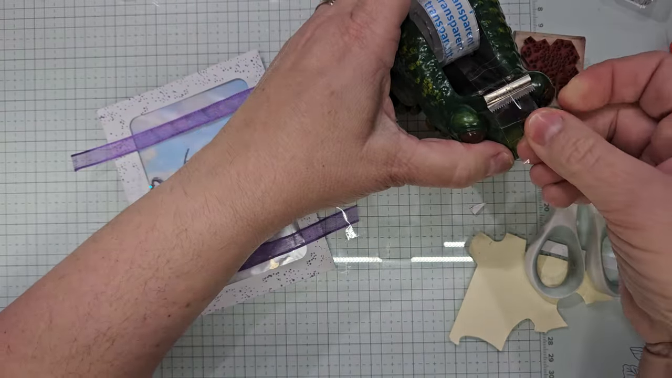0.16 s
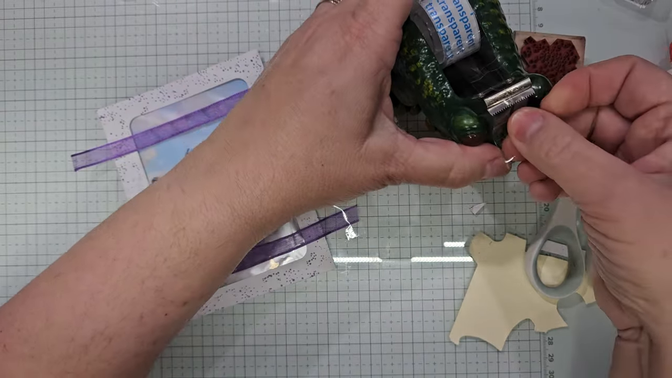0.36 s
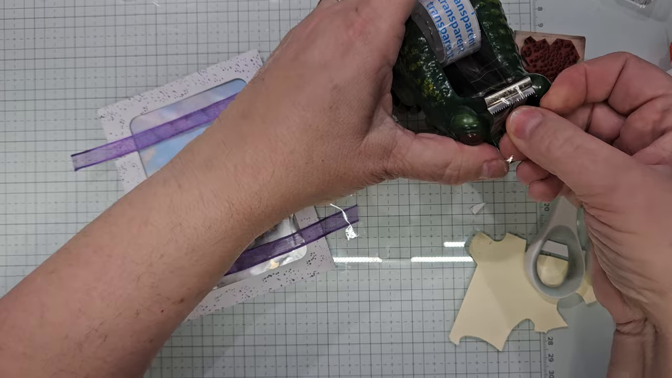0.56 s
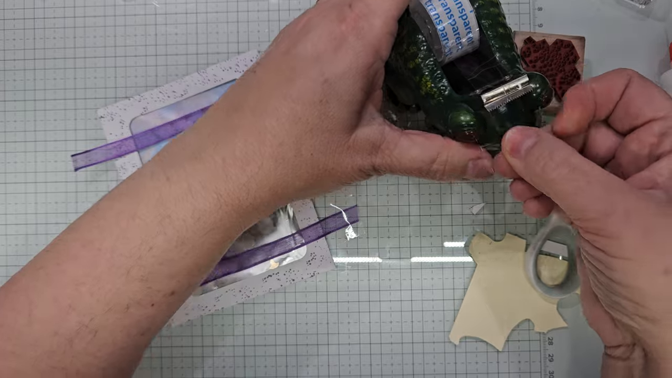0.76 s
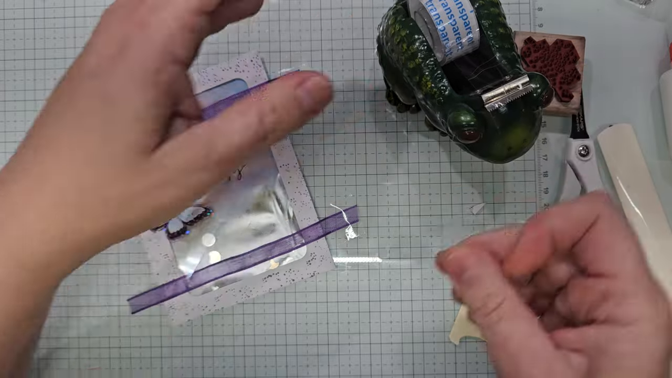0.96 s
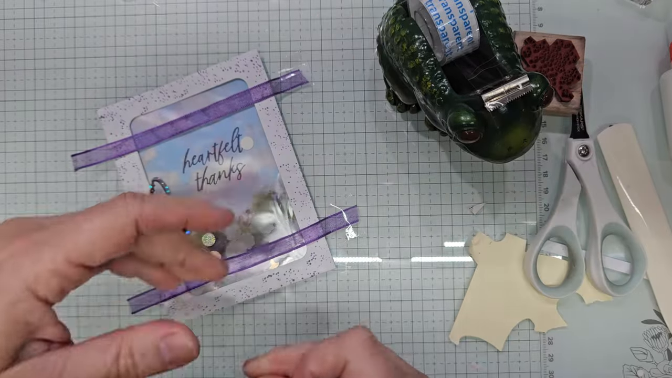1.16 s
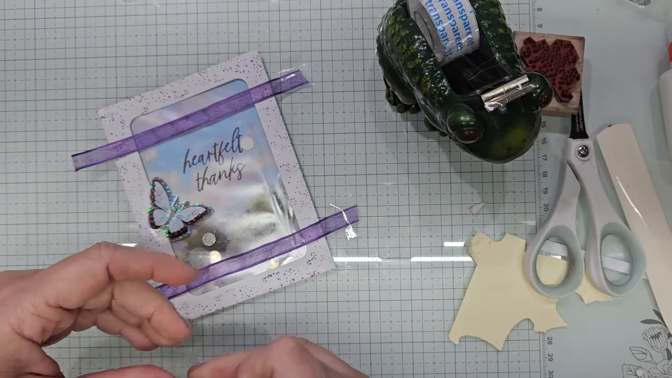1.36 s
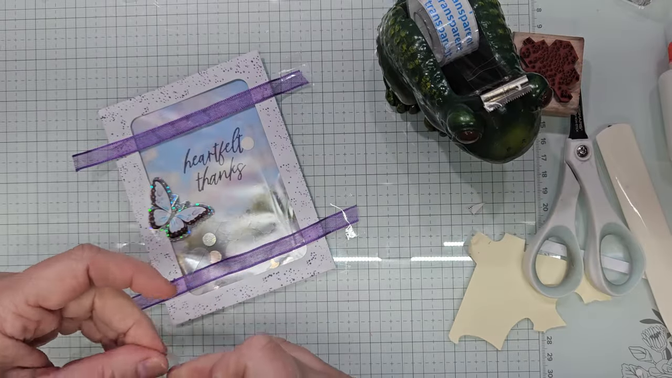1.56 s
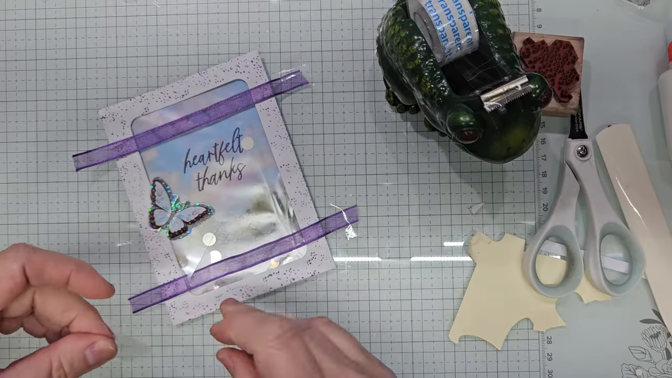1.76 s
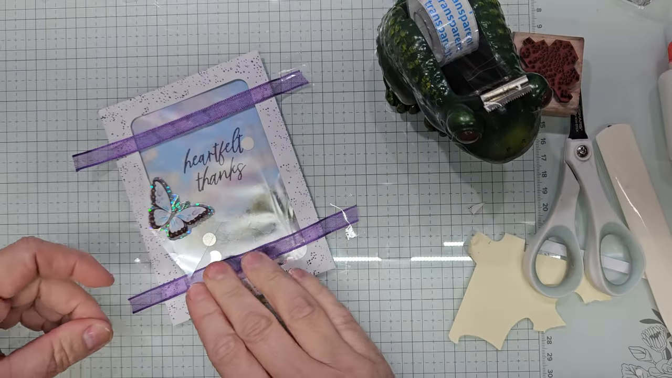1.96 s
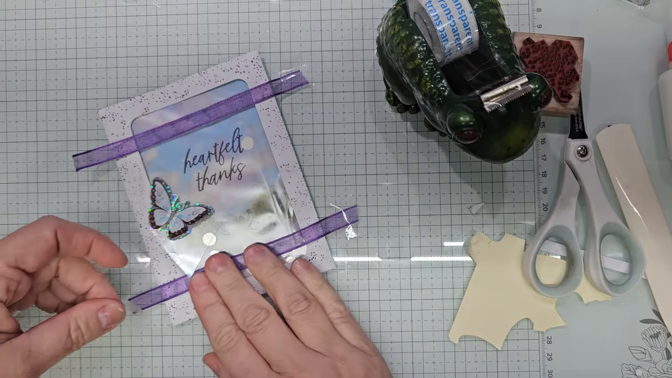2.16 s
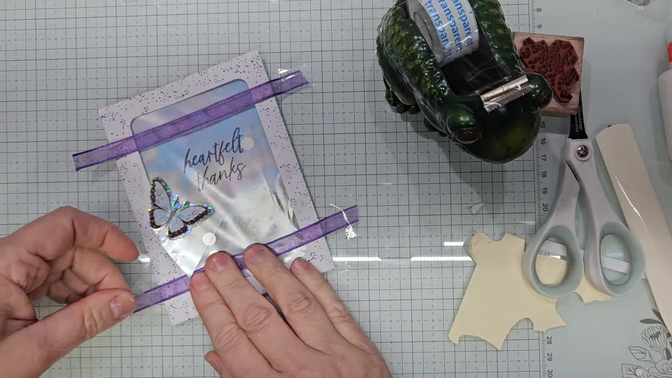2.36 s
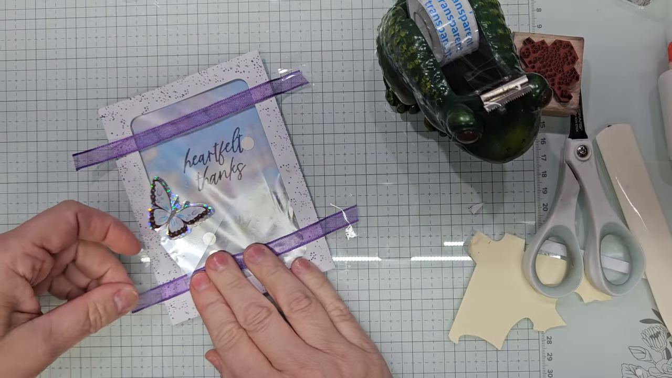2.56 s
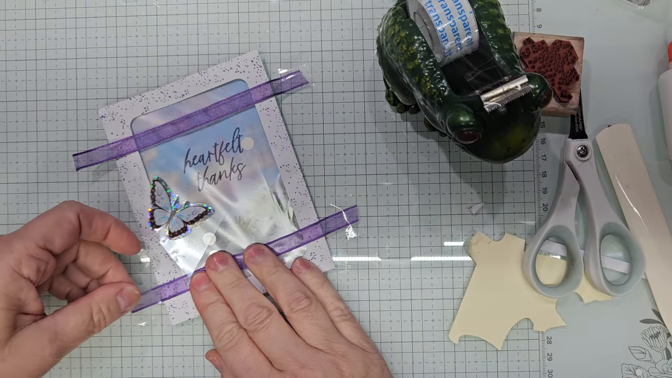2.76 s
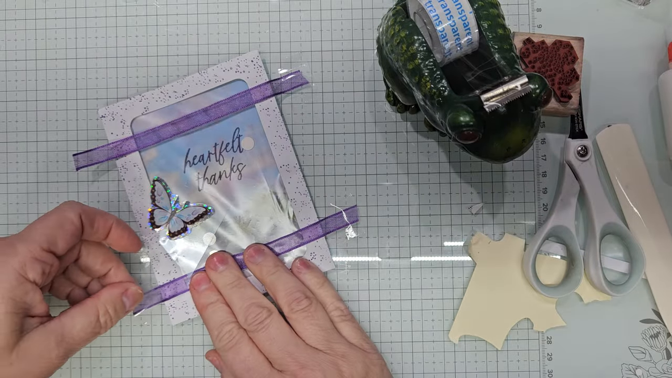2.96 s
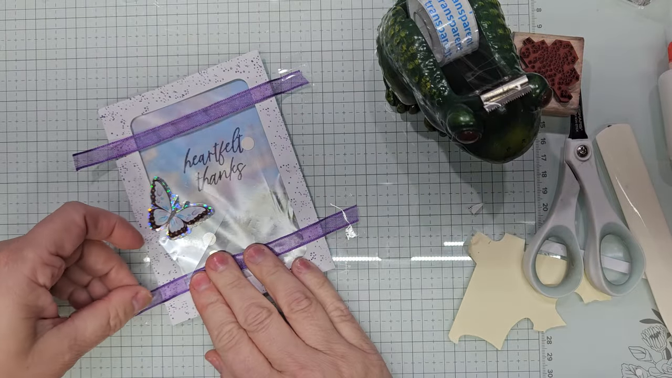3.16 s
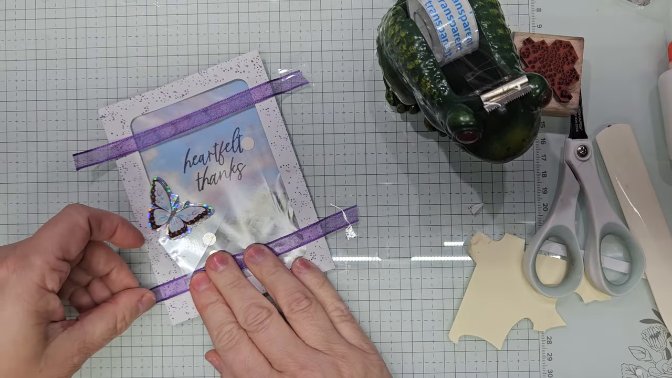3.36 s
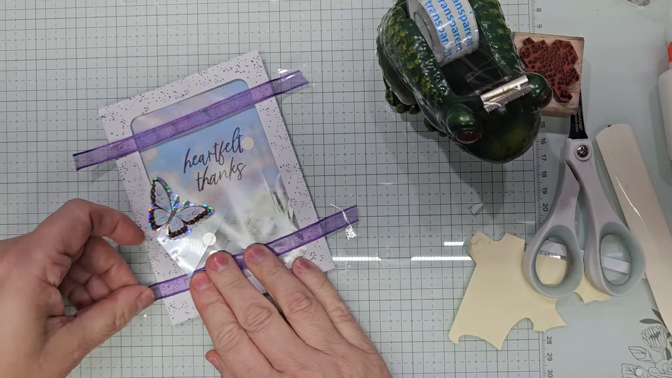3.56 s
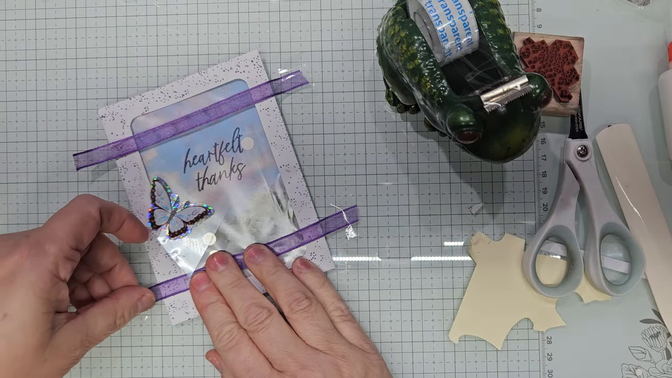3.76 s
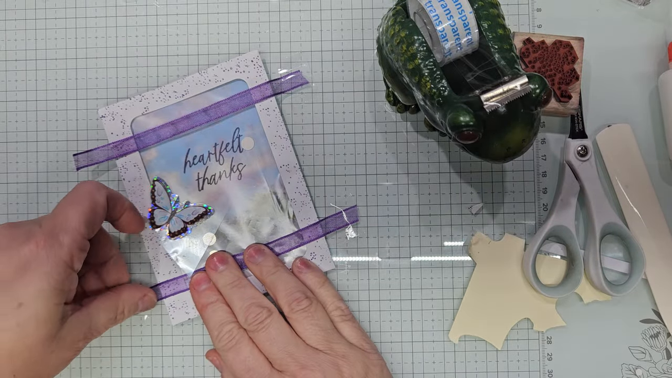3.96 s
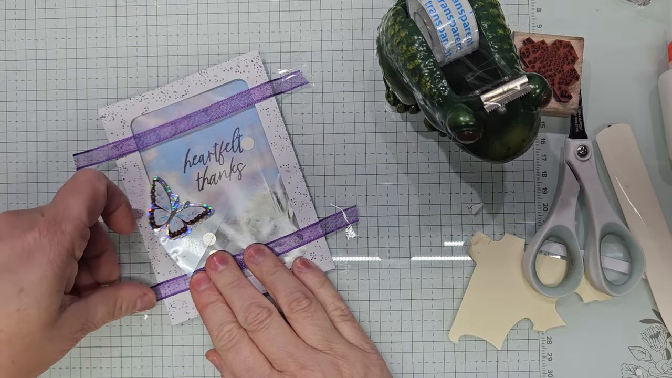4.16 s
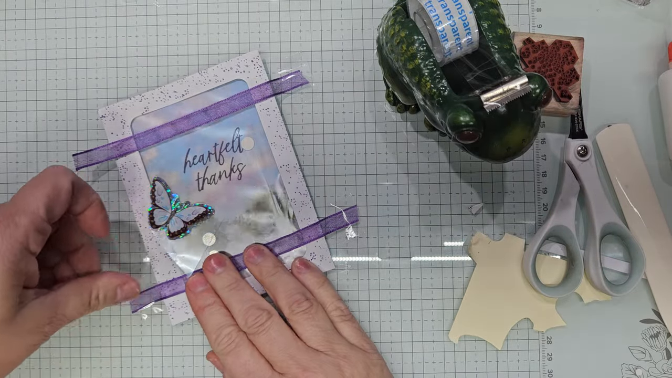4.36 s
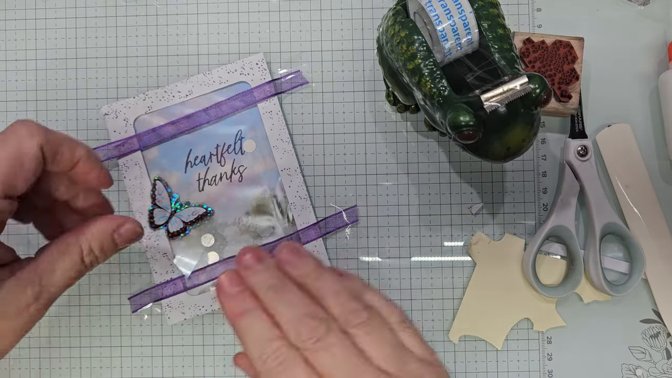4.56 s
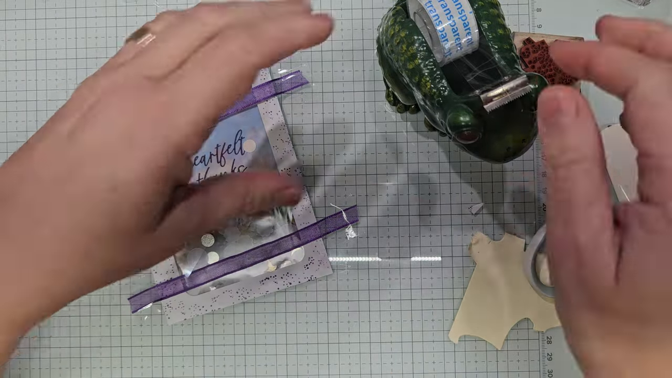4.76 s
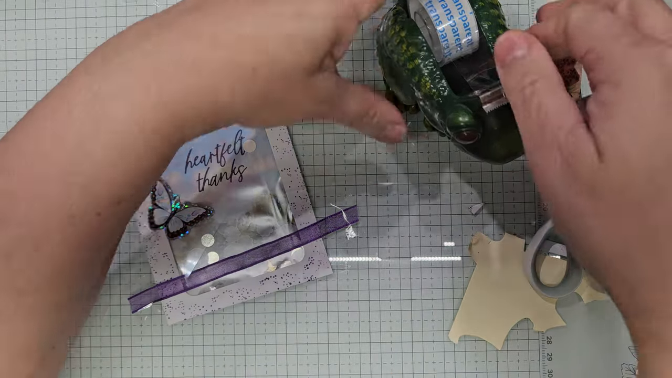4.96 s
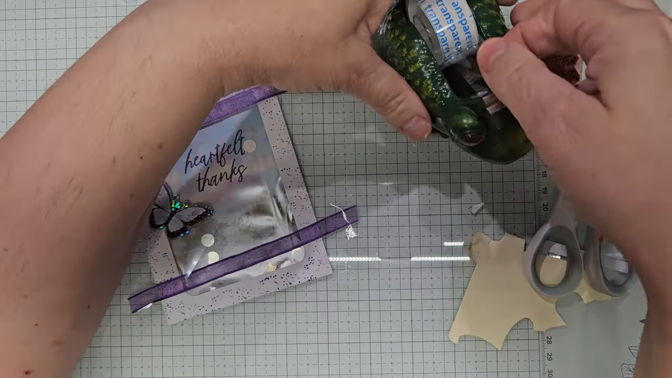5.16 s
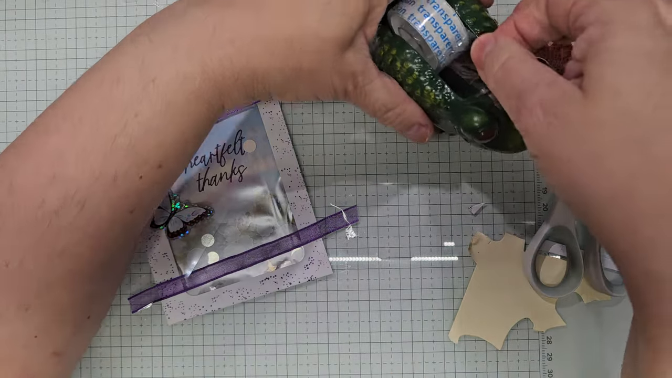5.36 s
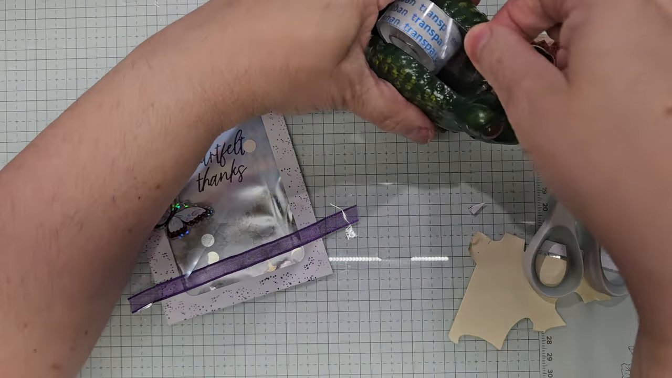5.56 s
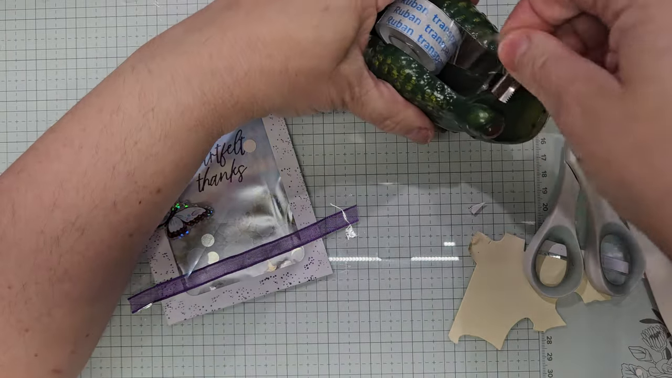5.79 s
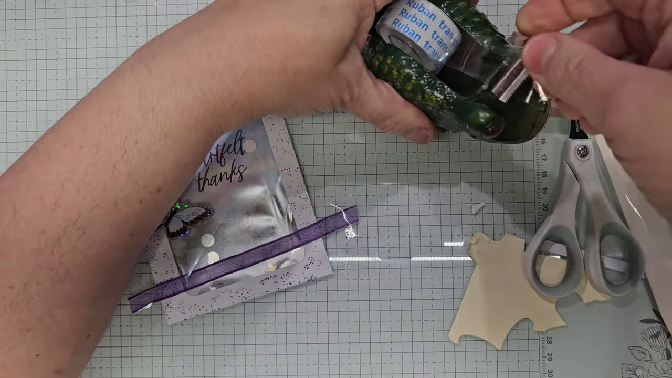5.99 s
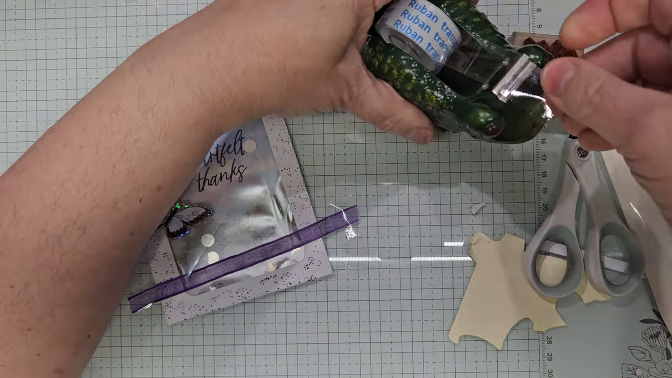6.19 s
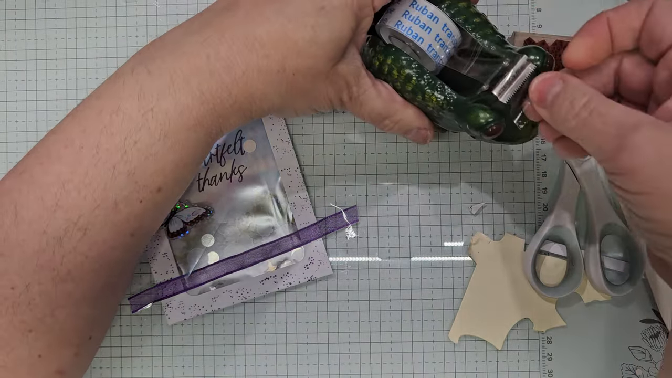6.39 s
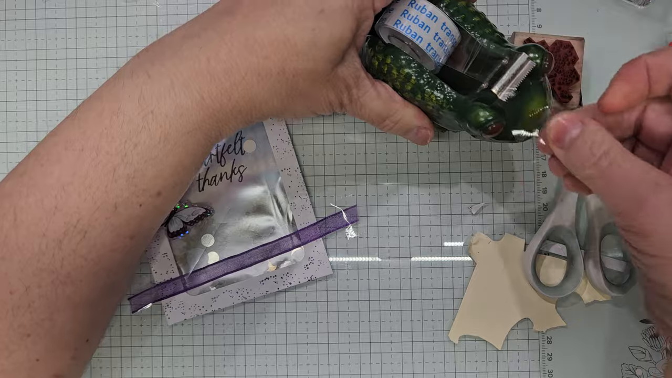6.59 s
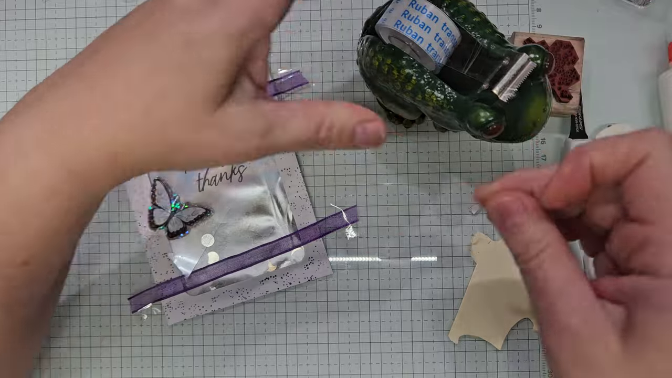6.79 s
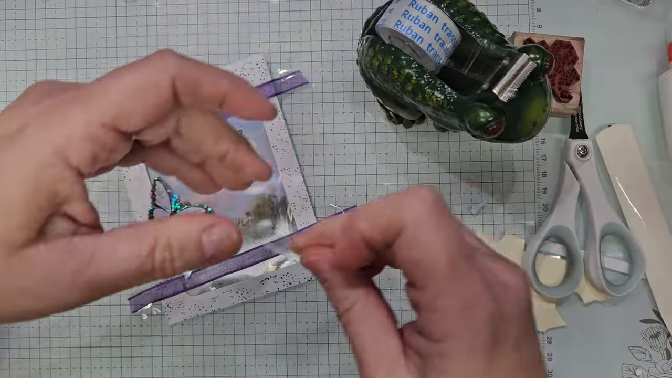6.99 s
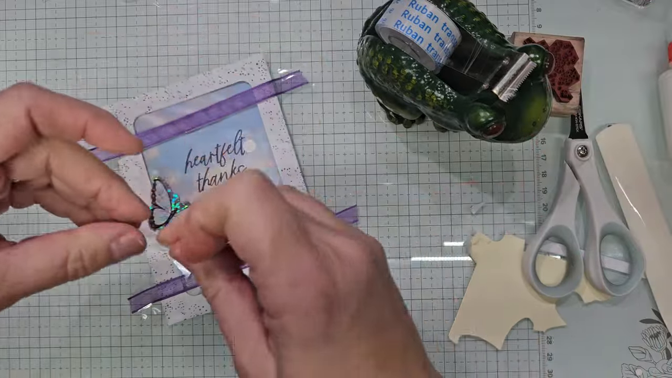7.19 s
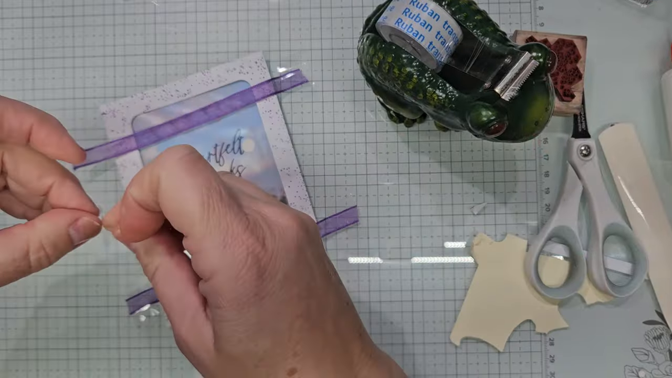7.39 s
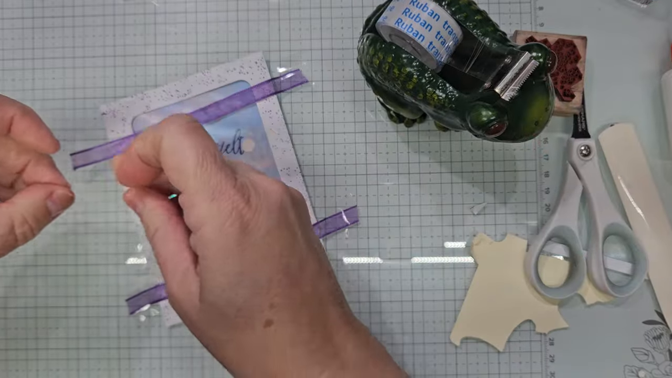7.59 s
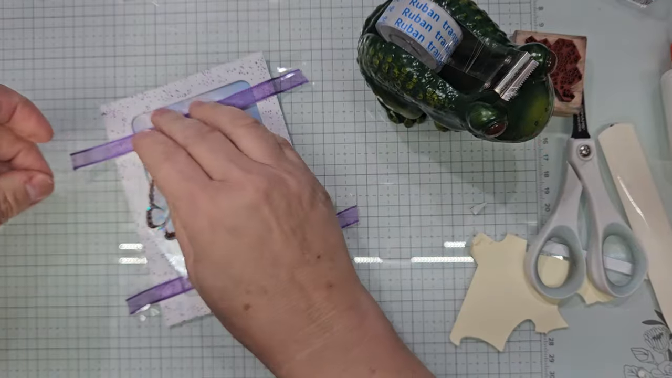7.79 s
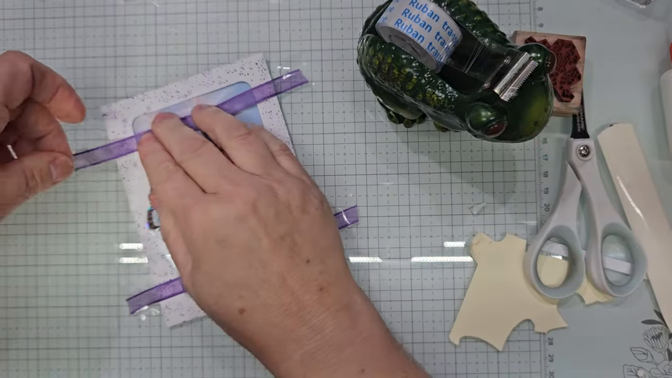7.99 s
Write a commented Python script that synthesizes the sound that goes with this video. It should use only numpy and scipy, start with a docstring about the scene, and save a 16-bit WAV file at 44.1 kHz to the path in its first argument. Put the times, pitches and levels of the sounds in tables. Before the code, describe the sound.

Close above a craft table in a small quiet room, fingers tick and crackle on tape, which tears sharply on a dispenser's teeth. Small crisp ticks follow as it is pressed onto a card, with long near-silent gaps. Then tape is pulled from the roll in loud, stuttering jerks with dull table thuds, torn with a bright snap, and handled softly again over a low hum.

```python
"""First a crackle and a cluster of finger ticks close by, then adhesive tape tears on the cutter of a ceramic
desk dispenser. It is stuck to a card, peeled off the roll in stick-slip jerks and torn again.
Snaps and crackle excite resonances of film, roll and hands; decaying modes make the taps, rings and table thuds.
The place is a small quiet room with a low hum, heard by a two-microphone phone above the table."""
import sys
import numpy as np
from scipy import signal
from scipy.fft import rfft, irfft, next_fast_len
from scipy.io import wavfile
from scipy.ndimage import uniform_filter1d, map_coordinates

SR = 44100
rng = np.random.default_rng(int(sys.argv[2]) if len(sys.argv) > 2 else 0)


def store_wav(level_fs):
    """Save 16-bit WAV to argv[1]."""
    pcm = np.round(np.clip(np.atleast_2d(level_fs), -1, 1) * 32767)
    wavfile.write(sys.argv[1], SR, pcm.T.astype(np.int16))


N = 354123  # length [samples]


def amp(db):
    """Decibels to gain."""
    return 10 ** (np.asarray(db) / 20)


def unit(x):
    """Scaled to rms 1."""
    return x / np.sqrt(np.mean(x ** 2) + 1e-20)


def along(points, hz):
    """Interpolates (frequency [Hz], value) points on a log frequency axis."""
    f, v = np.transpose(points)
    return np.interp(np.log(hz + 1), np.log(f + 1), v)


def wobble(rate):
    """A smooth random curve with rate knots a second."""
    return map_coordinates(rng.standard_normal(int(N * rate / SR) + 4), [np.arange(N) * rate / SR])


def filtered(x, response):
    """x times a complex response of frequency."""
    m = next_fast_len(N + SR // 2)
    return irfft(rfft(x, m) * response(np.fft.rfftfreq(m, 1 / SR)), m)[..., :N]


def resonant(drives, peaks):
    """One drive for each resonance (or one for all), summed with alternating sign."""
    m = next_fast_len(N + SR // 2)
    f, spectra = np.fft.rfftfreq(m, 1 / SR), rfft(drives, m)
    out = 0
    for k, (center, width, db) in enumerate(peaks):
        band = 1j * f * width / (center * center - f * f + 1j * f * width)
        out = out + (-1) ** k * amp(db) * band * spectra[k % len(spectra)]
    return irfft(out, m)[..., :N]


def shares(peaks, hz, octaves, least):
    """The spot that is excited favours the resonances nearest to hz."""
    return np.array([least + np.exp(-(np.log2(center / hz) / octaves) ** 2) for center, _, _ in peaks])


SWELL_DB = 23.5  # a burst rises by this much and falls by it again
EDGE_S = .004  # fade from and to near silence


def burst(start, rise, hold, fall, db):
    """Gain per sample: a swell, a hold and a fall, nearly silent outside."""
    s = start + np.cumsum([-EDGE_S, EDGE_S, abs(rise), abs(hold), abs(fall), EDGE_S])
    levels = [-120, db - SWELL_DB, db, db, db - SWELL_DB, -120]
    return amp(np.interp(np.arange(N) / SR, s, levels))


# Dispenser, roll and cupped hands at the microphone: (frequency [Hz], width [Hz], relative level [dB])
BODY_PEAKS = [(714, 130, 2.5), (1056, 250, -0.5), (1300, 330, 4.5), (1550, 390, 4), (2300, 280, -1.5)]
# Taut tape: (frequency [Hz], width [Hz], relative level [dB])
FILM_PEAKS = [(3210, 800, -4), (4100, 700, -2), (4870, 890, -2.5), (6740, 1750, -2), (8720, 2200, -2.5)]
# Above the microphone's notch: (frequency [Hz], width [Hz], relative level [dB])
TREBLE_PEAKS = [(11240, 2200, -2), (13660, 2700, -1), (15800, 1800, -2)]


def voiced(film, body, treble):
    """Three drives ring the tape, the body and the top octave."""
    # the small body radiates no bass
    steep = filtered(resonant(body, BODY_PEAKS), lambda f: (1j * f / (1j * f + 380)) ** 2)
    return resonant(film, FILM_PEAKS) + amp(10.0) * steep + amp(5.5) * resonant(treble[None], TREBLE_PEAKS)


def snaps(rows, ms, fizz, gain_db, focus):
    """Each snap is one sharp pull of air and a few ms of fizz; the heavy body feels mostly the pull."""
    film = np.zeros((len(FILM_PEAKS), 2, N + 1024))
    body = np.zeros((len(BODY_PEAKS), 2, N + 1024))
    treble = np.zeros((2, N + 1024))
    t = np.arange(1024) / SR
    fade = amp(-60 * t / (max(ms, 1) / 1000))
    pull = -1. * (t == 0)
    for s, db, film_hz, body_db, body_hz, treble_db in rows:
        z = rng.standard_normal((3, len(t)))
        hiss = (0.94 * z[0] + z[1:]) * fade  # partly shared by the two microphones
        hiss = fizz * hiss * np.linalg.norm(fade) / np.linalg.norm(hiss, axis=1, keepdims=True)
        at = slice(round(s * SR), round(s * SR) + len(t))
        film_share = shares(FILM_PEAKS, film_hz, focus, 0.43)[:, None, None]
        body_share = shares(BODY_PEAKS, body_hz, 0.11, 0.31)[:, None, None]
        film[..., at] += amp(db + gain_db) * film_share * (pull + hiss)
        body[..., at] += amp(db + gain_db + body_db) * body_share * (pull + 0.59 * hiss)
        treble[..., at] += amp(db + gain_db + treble_db) * (pull + hiss)
    return film[..., :N], body[..., :N], treble[..., :N]


TAUT_HZ, TREBLE_DB_PER_OCTAVE = 7100, 7  # tighter film snaps higher and with more top octave


def tautened(rows, top_db):
    """Adds the treble level [dB] that follows from each row's film pitch."""
    return [(*row, top_db + TREBLE_DB_PER_OCTAVE * np.log2(row[2] / TAUT_HZ)) for row in rows]


def knocks(rows, modes, attack):
    """Soft blows ring a set of modes, at slightly new strengths and pitches each time."""
    out = np.zeros(N + SR)
    t = np.arange(round(SR * max(t60 for *_, t60 in modes))) / SR
    onset = (1 - np.exp(-t / attack)) ** 2
    for s, db in rows:
        luck_db = rng.normal(0, 1.1, len(modes))
        bend = 1 + rng.normal(0, .03, len(modes))
        ring = 0
        for k, (hz, level, t60) in enumerate(modes):
            ring = ring + amp(level + luck_db[k] - 60 * t / t60) * np.sin(2 * np.pi * hz * bend[k] * t)
        out[round(s * SR):][:len(t)] += amp(db) * ring * onset
    return out[:N]


# Room tone spectrum at the phone: (frequency [Hz], relative level per Hz [dB])
FLOOR_SPECTRUM = [(15, -38), (25, -13.5), (100, -11.5), (127, -21.5), (242, -26), (590, -37), (800, -33.5),
                  (1400, -37.5), (2600, -40.5), (6500, -39.5), (7300, -33.5), (8000, -43), (8700, -35.5),
                  (9400, -45.5), (16000, -46.5)]
# Its slow swell: (time [s], relative level [dB])
FLOOR_SWELL = [(0, -69), (4, -73), (5.2, -70), (7.6, -75), (8.03, -68.5)]
# Left-right likeness of the room tone: (frequency [Hz], correlation [-1 to 1])
LIKENESS = [(60, 0.46), (240, 0.42), (950, -0.12), (3770, 0.03), (15000, 0.15)]
# Hum lines: (center frequency [Hz], relative level [dB])
HUM_LINES = [(48.4, -71), (96.9, -70)]
HUM_WAVER_DB, HUM_WAVER_HZ = 4, 3.5  # scale of the random waver


def room_tone():
    """Low rumble, two wavering hum lines and a faint hiss."""
    z = signal.stft(rng.standard_normal((2, N)), nperseg=512)[2]
    unevenness = uniform_filter1d(rng.standard_normal(z.shape[1:]), size=8, axis=0)
    unevenness = uniform_filter1d(unevenness, size=40, axis=1)
    noise = signal.istft(z * amp(1.4 * unit(unevenness)), nperseg=512)[1][:, :N]

    def mid_side(hz):
        turn = np.arccos(np.clip(along(LIKENESS, hz), -1, 1)) / 2
        return amp(along(FLOOR_SPECTRUM, hz)) * [np.cos(turn), np.sin(turn)]

    mid, side = filtered(noise, mid_side)
    hum = 0
    for hz, db in HUM_LINES:
        level = amp(db - 4.5 + HUM_WAVER_DB * wobble(11))
        phase = 2 * np.pi * np.cumsum(hz + HUM_WAVER_HZ * wobble(6.0)) / SR
        hum = hum + level * np.sin(phase)
    swell_db = np.interp(np.arange(N) / SR, *np.transpose(FLOOR_SWELL))
    return unit(np.array([mid + side, mid - side])) * amp(swell_db - 3.0) + hum


# Bursts of dense crackle from glue and film, close by:
# (start time [s], rise [s], hold [s], fall [s], relative level [dB], body level [dB], body frequency [Hz])
CRACKLE_BURSTS = [(0, 0.00042, 0.0028, 0.033, -46.5, -12.5, 1811),
                  (0.023, 0.007, 0.031, 0.011, -65, -5, 2179), (0.099, 0.01, 0.0087, 0.019, -47, -15, 2176),
                  (0.671, 0.0033, 0.026, 0.042, -44.5, -16.5, 1408),
                  (0.741, 0.0022, 0.042, .01, -63, -11.5, 1199),
                  (0.784, 0.025, 0.0018, 0.0047, -47, -12.5, 1300),
                  (1.544, 0.002, .022, .004, -67.5, -8, 1258),
                  (1.683, 0.042, 0.013, 0.012, -39.5, -9, 1252),
                  (3.44, .002, 0.032, 0.044, -71.5, -20.5, 1197),
                  (4.439, .01, 0.022, .03, -73.5, -12, 1198),
                  (3.987, 0.0018, 0.072, 0.073, -63.5, -3, 940.4),
                  (5.233, 0.019, 0.0095, 0.008, -55, -8, 1496),
                  (5.339, 0.0023, 0.33, 0.0052, -52, -17.5, 2179),
                  (5.503, 0.089, .002, 0.0022, -46, -15.5, 1086), (5.599, .002, .09, .004, -23.5, -13, 720),
                  (5.72, .02, .06, 0.15, -57, -9.5, 905.6), (5.892, 0.14, .002, 0.088, -54.5, -14, 1391),
                  (6.471, 0.018, 0.00426, 0.027, -21.5, -29, 1470), (7.02, .002, .002, .057, -55, -8, 1600),
                  (7.127, 0.025, 0.045, 0.0038, -73.5, 2, 803.5),
                  (7.541, 0.035, 0.036, 0.0084, -48, -20.5, 1477),
                  (7.589, 0.023, 0.05, 0.0056, -55, -1.5, 1244)]


def crackle():
    """Thousands of tiny glue threads break at random, some louder than the rest."""
    level, felt = np.zeros(N), np.zeros((len(BODY_PEAKS), N))
    for *shape, body_db, body_hz in CRACKLE_BURSTS:
        gain = burst(*shape)
        level += gain
        felt += amp(body_db) * shares(BODY_PEAKS, body_hz, 0.21, 0.17)[:, None] * gain
    loudness = amp(4.5 * rng.exponential(size=N).clip(0, 2.5))
    breaks = (rng.random(N) < 1800 / SR) * loudness  # about 1800 a second
    decay = amp(-60 * np.arange(88) / 60)  # 60 dB in 60 samples
    grains = unit(np.convolve(breaks, decay)[:N] + 0.16) * amp(1.9 * wobble(120))
    z = rng.standard_normal((3, N))
    drive = grains * (z[0] + 0.096 * z[1:])
    return (drive * level)[None], felt[:, None] * drive, drive * level


# Tape and card under the fingers, close by:
# (time [s], relative level [dB], film frequency [Hz], body level [dB], body frequency [Hz])
FINGER_TICKS = [(0.0506, -23, 4020, -2.5, 2480), (0.0535, -32.5, 4150, -7, 2460),
                (0.0645, -57, 2600, -2, 2460), (0.0755, -62, 2600, -5, 2460), (0.094, -43, 4330, -6, 1810),
                (0.1195, -40, 4050, -1, 2530), (0.124, -45, 4300, -5, 2300),
                (0.2393, -59.5, 3100, 10, 2120), (0.2866, -42.5, 4000, -2.5, 1164),
                (0.2955, -43, 4370, -5, 790), (0.3339, -43.5, 6750, -44, 740),
                (0.532, -66.5, 8900, -33, 850), (0.5497, -54.5, 9300, -25, 850),
                (1.3714, -49.5, 5500, 5, 660), (1.5635, -57, 4600, 3.5, 1284),
                (1.5734, -41, 4500, -11, 1257), (1.681, -57, 4700, 2, 1260),
                (1.6952, -41.5, 7630, -12, 1300), (1.7056, -38.5, 8830, -5, 1263),
                (1.7183, -36.5, 7950, -6, 1300), (1.736, -31.5, 8500, -6.5, 1630),
                (1.744, -28, 7100, -2.5, 1450), (2.265, -50.5, 4600, -21, 700),
                (2.2834, -52, 4450, -25, 675), (2.7128, -46.5, 5900, -7.5, 870),
                (3.2179, -46.5, 3600, -15, 2360), (3.357, -62, 9350, -23, 1190),
                (3.4385, -55, 8200, -14.5, 1109), (4.0061, -34.5, 6130, -11.5, 2300),
                (4.0239, -36, 7400, -17.5, 1300), (4.036, -32, 7200, -13, 700),
                (4.522, -59.5, 7940, -17, 1199), (4.9912, -43, 6320, 0, 1942),
                (5.078, -49, 3425, -10, 2240), (5.1046, -52.5, 3900, 2, 660), (5.984, -50, 7500, -25, 1500),
                (5.9965, -43.5, 7000, -13, 1490), (6.0695, -42, 4200, -26, 1513),
                (6.1306, -49, 8830, -26, 1264), (6.1868, -56.5, 8930, -12.5, 1540),
                (6.7333, -55.5, 4440, -5.5, 1392), (7.015, -43.5, 5600, 3.5, 2074),
                (7.0653, -57.5, 3300, 7, 2119), (7.156, -71, 3290, 4, 2220),
                (7.506, -56, 8590, -38.5, 1195), (7.5577, -53, 5400, -21, 1550),
                (7.5876, -48, 7000, -8, 1550), (7.6157, -42, 3212, -2, 1630), (7.625, -46, 4506, -3, 1515),
                (7.652, -48, 4750, 2.5, 1045), (8.009, -47, 3800, -1.5, 1417)]


def ticks():
    """Fingers tick on tape and card: light snaps with a fizz that dies in 9 ms."""
    return snaps(tautened(FINGER_TICKS, top_db=-5.5), ms=9.0, fizz=0.61, gain_db=12.5, focus=0.56)


# Jolts of the table below the phone: (time [s], slow sway level [dB], knock level [dB])
JOLTS = [(0.706, -25.5, -31), (4.409, -43.5, -64.5), (5.455, -34, -42), (5.611, -48, -36),
         (5.69, -46, -31.5), (5.87, -54, -57), (6.06, -47, -56.5), (6.485, -44, -31.5), (6.503, -32, -35),
         (6.688, -42.5, -58), (7.051, -66.5, -47)]
# Low knocks under some ticks, slips and rips: (time [s], level [dB])
LOW_KNOCKS = [(0.051, -52.5), (4.036, -54), (6.037, -47), (6.486, -40), (7.053, -55)]
# Table top: (frequency [Hz], level [dB], t60 [s])
TOP_MODES = [(85.6, -6.5, .09), (136.5, -1, 0.11), (237, -4.5, 0.078), (321, -4.5, 0.051),
             (453, -5.5, .035)]
# The whole table on its legs: (frequency [Hz], level [dB], t60 [s])
SWAY_MODES = [(59.5, -2, 0.19)]
SLIP_KNOCK_DB = -31  # slip knocks on the table top, relative to the slip's row level
SOFT_HZ, SHARP_HZ = 160, 247  # a padded jolt rings the top below this; a low knock or slip above this


def table(slip_rows):
    """Jolts knock the top dully and sway the legs more slowly; low knocks and glue slips ring it sharply."""
    s, sway_db, knock_db = np.transpose(JOLTS)
    sharp_rows = LOW_KNOCKS + [(row[0], row[1] + SLIP_KNOCK_DB) for row in slip_rows]
    jolts = np.array([knocks(zip(s, knock_db), TOP_MODES, attack=0.0022) for _ in range(2)])
    quick = np.array([knocks(sharp_rows, TOP_MODES, attack=0.00066) for _ in range(2)])
    dull = filtered(jolts, lambda f: 1 / (1 + 1j * f / SOFT_HZ) ** 2)
    sharp = filtered(quick, lambda f: (1j * f / (1j * f + SHARP_HZ)) ** 2)
    sway = knocks(zip(s, sway_db), SWAY_MODES, attack=0.026)
    return dull + sharp + sway * amp([[1.5], [-1.5]])  # the sway is stronger on the left


# Fingers slide on smooth film: (start time [s], rise [s], hold [s], fall [s], level [dB])
FINGER_SLIDES = [(0.06, 0.06, 0.18, 0.06, -67), (2.15, 0.11, 0.46, 0.2, -86.5),
                 (7.723, 0.14, .2, .01, -75.5)]
# Sliding hiss: (frequency [Hz], width [Hz], relative level [dB])
SKIN_PEAKS = [(2580, 1100, -8.5), (4700, 900, 1), (8150, 10000, -10), (12600, 840, -5.5)]


def slides():
    """Skin hisses softly along the film: broad resonances of noise, gently wavering."""
    z = rng.standard_normal((3, N))
    hiss = unit(resonant((z[0] + 0.83 * z[1:])[None], SKIN_PEAKS))
    return hiss * sum(burst(*row) for row in FINGER_SLIDES) * amp(1.8 * wobble(43))


# Fingertips on the dispenser and card: (time [s], level [dB])
FINGERTIP_TAPS = [(0.109, -36.5), (3.378, -48.5), (3.621, -56), (4.443, -48), (5.033, -48), (5.078, -50),
                  (5.106, -54), (6.68, -52), (6.725, -49), (7.054, -41), (7.156, -51.5)]
# The hollow that taps ring: (frequency [Hz], level [dB], t60 [s])
HOLLOW_MODES = [(660, -0.5, 0.0097), (970, -17.5, 0.021)]


def taps():
    """Soft fingertips ring a short-lived hollow."""
    return knocks(FINGERTIP_TAPS, HOLLOW_MODES, attack=0.0026)


# The tape rips on the cutter's teeth, close by:
# (time [s], relative level [dB], film frequency [Hz], body level [dB], body frequency [Hz])
TOOTH_RIPS = [(0.6781, -21, 5600, -39, 1490), (0.6833, -22.5, 5600, -46, 1500),
              (0.6948, -6.5, 5900, -18, 651), (0.7168, -26, 7600, -34, 1500),
              (0.7266, -40.5, 5360, -7, 674), (0.7896, -37, 7250, -6.5, 776),
              (0.7955, -37, 6700, -23, 1370), (0.8005, -28, 6400, -30, 1340),
              (0.8105, -29, 6800, -8.5, 1164), (6.4757, -30, 8315, -23.5, 1424),
              (6.4818, -13, 7670, -37, 1435), (6.4863, -13, 4604, -14, 671), (6.491, -27, 4600, -13, 1370)]


def tears():
    """The film gives way on the teeth in a run of fizzing snaps."""
    return snaps(tautened(TOOTH_RIPS, top_db=-2.3), ms=5.9, fizz=0.81, gain_db=9.5, focus=0.47)


# Hard tugs on the dispenser: (time [s], level [dB])
SHELL_TUGS = [(5.27, -26.5), (5.456, -34.5), (5.597, -26), (5.846, -31), (6.489, -29)]
# The dispenser's ceramic shell: (frequency [Hz], level [dB], t60 [s])
SHELL_MODES = [(670, -8, .025), (1110, -13, .03), (1480, -1, .034)]


def shell_rings():
    """Hard tugs ring the modes of the ceramic shell."""
    return knocks(SHELL_TUGS, SHELL_MODES, attack=0.0033)


# Runs of slips of the glue line in the pull; a long jerk is several runs in succession:
# (first slip time [s], last slip time [s], slips [count], relative level [dB], film frequency [Hz],
#  body level [dB], body frequency [Hz], treble level [dB])
SLIP_RUNS = [(5.2694, 5.2695, 1, -11, 7800, -13, 1490, 1), (5.4479, 5.4664, 3, -9, 7200, -11, 1452, 1.5),
             (5.5954, 5.6014, 2, -7, 7100, -9.5, 1504, -6), (5.611, 5.6237, 3, -6, 6800, -12.5, 1424, -6),
             (5.6295, 5.6334, 2, -9.5, 7000, -14, 1300, -6.5),
             (5.6395, 5.6532, 4, -9, 7300, -15.5, 1100, -5.5), (5.6587, 5.6681, 3, -7, 7365, -18, 908, -6),
             (5.6765, 5.693, 3, -8, 6900, -19, 897.5, -3.5), (5.8456, 5.8651, 3, -15.5, 4570, -8, 717, -2),
             (5.8996, 5.8996, 1, -33, 7300, -15, 1670, 7), (5.9402, 5.9401, 1, -28, 3620, -24, 2260, -11.5),
             (6.0286, 6.0288, 1, -21, 3060, -10.5, 1685, -7),
             (6.037, 6.0368, 1, -20, 9000, -3.5, 1420, 1.5)]
BUNCHING, UNEVEN = 0.11, 0.055  # slips crowd toward mid-run; scatter [share of a gap]
FIRST_BODY_DB = 3  # the first slip of a run jolts the roll most
SLIP_SCATTER_DB, SPOT_OCTAVES = .8, .07  # slip-to-slip chance
BODY_SAG_DB, BODY_SINK_OCTAVES = 59, 6.3  # per second of a run, the roll's answer weakens and deepens


def slips():
    """Rows of single slips: each run spreads its slips between its first and its last."""
    rows = []
    for first, last, count, db, film_hz, body_db, body_hz, treble_db in SLIP_RUNS:
        luck, count = rng.standard_normal((24, 5)), round(count)
        length = last - first
        for k in range(count):
            shift = UNEVEN * luck[k, 0] if 0 < k < count - 1 else 0
            u = (k + shift) / max(count - 1, 1)  # progress through the run
            inner = luck[k] * (k > 0)  # the first slip has no scatter
            bunched = u + BUNCHING * np.sin(2 * np.pi * u) / (2 * np.pi)
            body_level = body_db + FIRST_BODY_DB * (k == 0) - BODY_SAG_DB * length * u
            rows.append((first + length * bunched,
                         db + SLIP_SCATTER_DB * inner[1],
                         film_hz * 2 ** (SPOT_OCTAVES * inner[2]),
                         body_level + 2 * SLIP_SCATTER_DB * inner[3],
                         body_hz * 2 ** (SPOT_OCTAVES * inner[4] - BODY_SINK_OCTAVES * length * u),
                         treble_db + 2 * SLIP_SCATTER_DB * inner[0]))
    return rows


def peel(slip_rows):
    """Stick-slip: the glue line holds, then lets go in snaps."""
    return snaps(slip_rows, ms=7, fizz=.43, gain_db=12.0, focus=1.0)


# Places of the hands: (left-right level [dB], time by which the right microphone lags [ms])
DISPENSER, CARD, DRAWN = (0.8, 0.0017), (2.9, 0.21), (2.3, 0.035)
# The hands start at the dispenser and move: (time [s], new place)
MOVES = [(1.1, CARD), (4.798, DISPENSER), (5.76, DRAWN), (6.3, DISPENSER), (6.9, CARD)]
MOVE_S = .2  # duration of a move


def placed(x):
    """Level and arrival time at each microphone follow the hands; long waves reach both alike."""
    mid, side = x.mean(0), filtered((x[0] - x[1]) / 2, lambda f: 1j * f / (1j * f + 1500))
    s = [s + half for s, _ in MOVES for half in (-MOVE_S / 2, MOVE_S / 2)]
    pan_db, lag_ms = np.repeat([DISPENSER] + [to for _, to in MOVES], 2, axis=0)[1:-1].T
    i = np.arange(N)
    pan = np.interp(i / SR, s, pan_db) / 2  # half to each side
    lag = np.interp(i / SR, s, lag_ms) * SR / 2000  # half to each side, in samples
    left = amp(pan) * map_coordinates(mid + side, [i + lag])
    right = amp(-pan) * map_coordinates(mid - side, [i - lag])
    return np.array([left, right])


# Decay of the small room: (frequency [Hz], t60 [s])
ROOM_DECAY = [(400, 0.25), (1000, 0.12), (2200, 0.13), (6000, .16), (15000, 0.086)]
# Table top, hands and shelf: (delay [ms], level [dB])
NEAR_ECHOES = [(1.9, -7), (3.4, -14.5), (12.5, -22)]


def room(x):
    """Near surfaces answer first, then a tail that dies band by band, drawn anew every eighth of a second."""
    out, step = np.zeros((2, N + 2 * SR)), SR // 8
    for start in range(0, N, step):
        hz, t, z = signal.stft(rng.standard_normal((2, SR // 4)), SR, nperseg=128)
        apart = np.clip(hz / 3500, .15, 1)[:, None]  # short waves differ between the microphones
        z = np.array([z[0] + apart * z[1], z[0] - apart * z[1]]) / np.sqrt(1 + apart ** 2)
        tail = signal.istft(z * amp(-60 * t / along(ROOM_DECAY, hz)[:, None]), SR, nperseg=128)[1]
        tail = amp(-4.0) * tail / np.linalg.norm(tail[0])
        tail = np.pad(tail, ((0, 0), (150, 0)))  # the tail starts 150 samples late
        for ms, db in NEAR_ECHOES:
            tail[[0, 1], round(ms * SR / 1000) + rng.integers(-3, 4, 2)] += amp(db)
        wet = signal.fftconvolve(x[:, start:start + step], tail, axes=1)
        out[:, start:start + wet.shape[1]] += wet
    return out[:, :N]


def scene():
    """Tape, fingers and table in the room."""
    slip_rows = slips()
    drives = [sum(parts) for parts in zip(peel(slip_rows), tears(), crackle())]
    light = placed(voiced(*ticks()))
    near = placed(voiced(*drives) + taps() + shell_rings())
    echoes = room(near + amp(-2.5) * light)  # hands shield the ticks from the room
    return near + light + echoes + slides() + table(slip_rows) + room_tone()


# Microphone colour: (frequency [Hz], level [dB])
MIC_COLOUR = [(400, 5), (9000, 1), (9900, -4.5), (10800, -4.5), (15700, -0.5), (16000, -12.5)]
TOP_HZ = 16500  # band limit


def record(dry):
    """The microphone has a notch in the treble; the phone keeps nothing above its band limit."""
    return filtered(dry, lambda hz: amp(along(MIC_COLOUR, hz)) * np.clip((TOP_HZ - hz) / 150, 0, 1))


dry = scene()
out = record(dry)
store_wav(out)
```